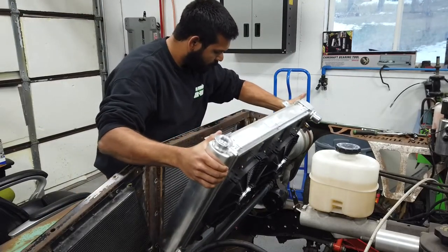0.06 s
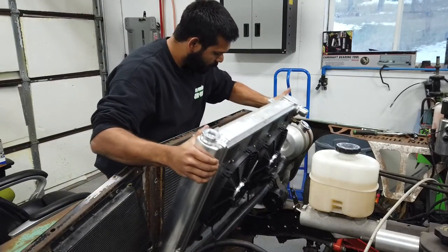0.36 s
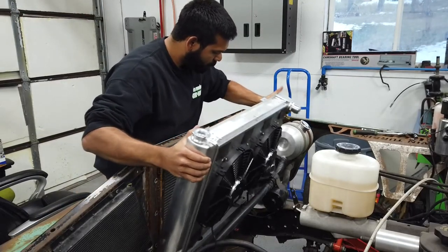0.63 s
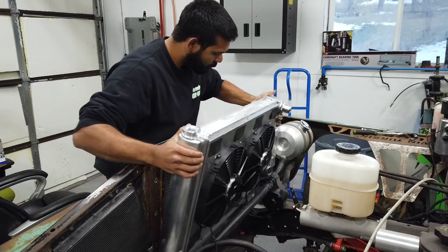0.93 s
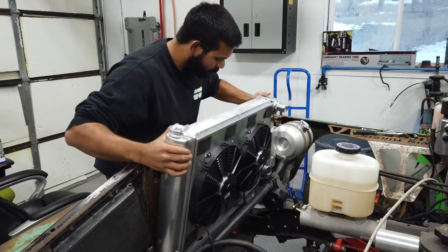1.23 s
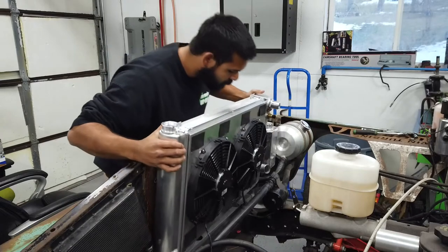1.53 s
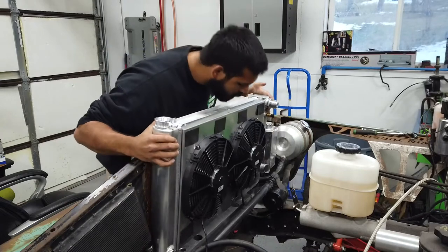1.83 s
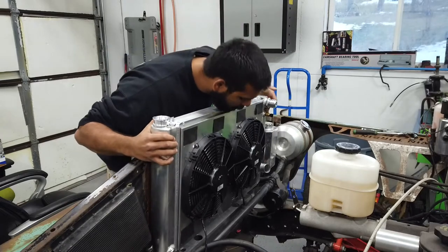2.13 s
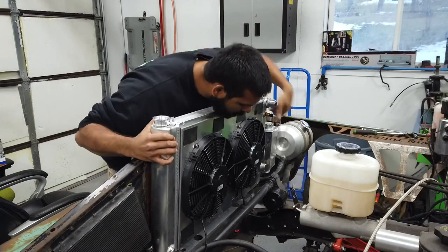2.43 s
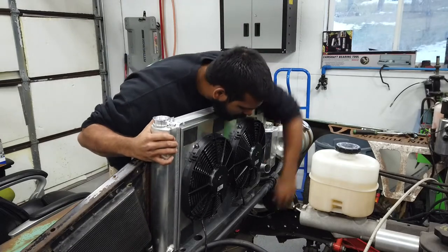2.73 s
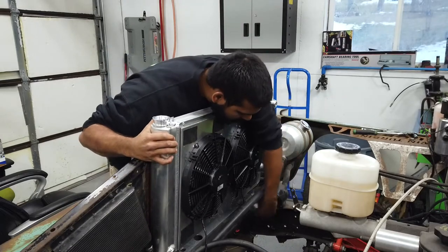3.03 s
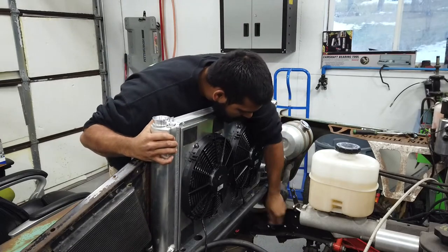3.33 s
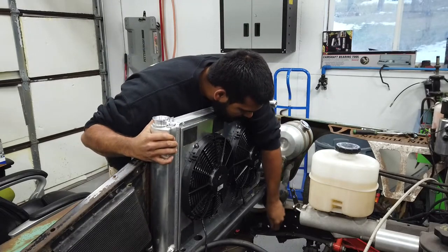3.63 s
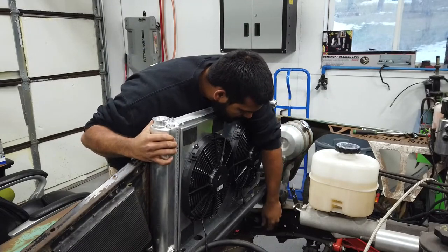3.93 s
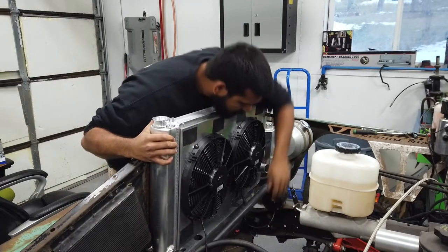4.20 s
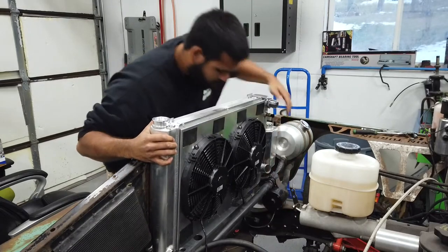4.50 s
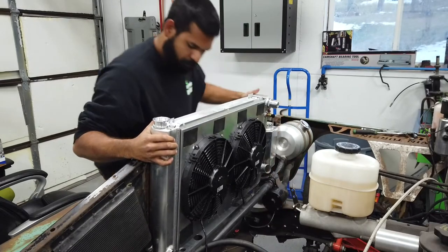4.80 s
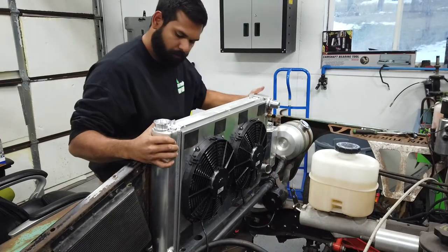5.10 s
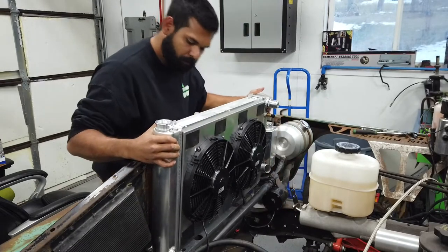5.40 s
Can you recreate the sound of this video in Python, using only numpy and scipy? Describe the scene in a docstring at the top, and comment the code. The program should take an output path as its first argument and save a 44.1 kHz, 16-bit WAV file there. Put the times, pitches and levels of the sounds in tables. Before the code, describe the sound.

A metal radiator is worked into a truck's front frame, heard from nearby in a garage with quiet room air and a faint electrical hum. It opens with a soft scrape and a brief metal groan, then light taps at about 0.5 seconds. From 1.1 to 3.2 seconds comes a run of irregular knocks, each a sharp snap with a short hollow ring. The strongest fall around 2 seconds and just after 3 seconds. Between them the metal scrapes and squeaks slightly, and a loose part clinks. After a lull of about a second, two more knocks with short groans come near 4.5 seconds. A last scrape and a small rattle follow at about 5.2 to 5.4 seconds. Throughout, the handling makes soft low bumps, and sleeves brush faintly against the metal.

```python
"""In a garage, over quiet room air and a mains hum, a metal radiator with its fans is lowered into a
truck's front frame. First come a scrape, a groan and light taps. From about 1 to 3 seconds it is rocked
into place: each knock snaps, the tanks, core and frame ring, and the room answers. In between, the metal
scrapes and a loose part clinks. Two more knocks come near 4.5 seconds, then a last scrape and rattle.
All along, the handling makes soft low bumps and sleeves brush the metal."""
import sys
import numpy as np
from scipy.fft import rfft, irfft, next_fast_len
from scipy.io import wavfile
from scipy.ndimage import map_coordinates

SR = 44100
rng = np.random.default_rng(int(sys.argv[2]) if len(sys.argv) > 2 else 0)


def put_to_file(sound):
    """Save the sound as 16-bit audio at rate SR, in the file named by the first command-line argument."""
    columns = np.atleast_2d(sound).T  # one column per channel
    safe = np.clip(columns, -1, 1)
    whole_steps = np.round(safe * 32767)
    wavfile.write(sys.argv[1], SR, whole_steps.astype(np.int16))


N = 244755

# The radiator hits the frame. Each row: start in seconds, strength in dB, then frame thud, tank boom
# and hardness in dB above that strength, and the struck spot's note in Hz.
KNOCK_EVENTS = [(0.508, -62.5, -5, -1, 24, 3670), (0.528, -61.5, -9, -13, 8, 900),
                (1.1276, -46, 12.5, 8.5, 11, 430), (1.289, -43.5, -7, -9.5, -6.5, 1833),
                (1.8655, -37, -15.5, 1, 10.5, 1980), (2.0511, -35.5, -1, -2, 3, 583),
                (2.128, -45.5, 4.5, -10, 1, 266), (2.295, -63, -4.5, -2.5, 17, 1147),
                (2.589, -61, -6, -13, -13, 1780), (2.918, -39.5, -16, 5.5, -1.5, 1503),
                (2.942, -44.5, -15, -2, -12, 556), (3.119, -36, 2, 1.5, 4, 1890),
                (3.137, -45.5, 2, 7.5, -5.5, 387), (3.211, -42, -10, -16.5, 13.5, 2010),
                (4.39, -43, -18, 1.5, -1, 576), (4.5764, -52.5, -14.5, 0, -8, 586)]
# The ringing has six bands: thud, boom, body, clank, edge, sizzle. Each entry: a band's centre in Hz.
BAND_CENTRES_HZ = [115, 275, 850, 2400, 4800, 9000]
# How a knock feeds the bands. Each row: offset in dB, then shares of thud, boom and hardness.
BAND_RECIPE = [(-2.5, 0.89, 0, 0), (0.5, 0.065, 0.84, 0.27), (-0.5, 0.02, 0.81, 0.34),
               (-1, 0.0064, 0, 0.011), (-20, 0.048, 0.018, 0.99), (-36.5, 0.2, 0.088, 0.86)]
# The tones in a crack. Each row: multiple of the crack's pitch, relative level in dB, life in seconds.
CRACK_TONES = [(1.15, 3.5, 0.00038), (.7, 2.5, 0.00028), (.31, -4.5, 0.00052)]
# The crack's echo off nearby surfaces, left then right. Each row: delay in seconds, gain in dB.
CRACK_ECHOES = [(.0034, -19.5), (.004, -11)]
# The tone colour of the ringing metal. Each row: frequency in Hz, relative level in dB.
RING_COLOUR = [(40, -13.5), (75, -3.5), (140, -2), (190, -5.5), (250, -0.5), (600, -4), (1200, -7),
               (2000, -12), (2950, -19), (3400, -28), (5100, -41), (6000, -51.5), (11300, -67),
               (16000, -79)]
# Its clearest tones. Each row: pitch in Hz, relative level in dB, seconds to fade by 60 dB.
CLEAR_TONES = [(154, -6.5, 0.57), (248, 5.5, 0.33), (356.4, 4.5, 0.25), (417, 1, 0.22), (466, -4.5, 0.37),
               (555.4, -4.5, 0.37), (595, 2.5, 0.16), (754, -1.5, 0.23), (912, -7, 0.38), (977, -6.5, 0.61),
               (1180, 3, 0.21), (1472, 0.5, 0.22), (1592, -4, 0.26), (1806, 2, 0.15), (1951, 3.5, 0.2),
               (2447, -1.5, 0.28), (2980, 4.5, 0.06)]
# How long metal and garage ring together. Each row: frequency in Hz, seconds to fade by 60 dB.
RING_FADE = [(80, 1), (250, 0.47), (700, 0.3), (2000, 0.44), (4500, 0.44), (11000, 0.27)]
# How slowly the ringing spreads. Each row: frequency in Hz, build-up time in seconds.
RING_BUILD = [(100, 0.0036), (260, 0.02), (600, 0.01), (1500, 0.003), (3500, 0.002), (8000, 0.027)]
# The struck spot flares before its energy spreads. Each row: frequency in Hz, dB above the ringing.
RING_FLARE = [(300, -17), (800, -7.5), (2000, -9), (4200, 2.5), (9000, -13)]
# How wide the metal sounds. Each row: frequency in Hz, left-right difference in dB against the middle.
METAL_WIDTH = [(30, -7), (60, -22), (110, -32), (300, -36), (600, -19.5), (1100, -16), (2200, -6.5),
               (4200, 1.5), (9000, 1)]
# A loose part clinks. Each row: start in seconds, strength in dB.
CLINK_EVENTS = [(1.381, -50), (1.455, -55), (2.093, -46.5), (3.137, -44.5), (5.315, -53), (5.324, -48),
                (5.36, -55.5), (5.394, -57.5)]
# A clink's ringing. Each entry: one band's relative level in dB, from thud to sizzle.
CLINK_BANDS_DB = [-2, -7.5, .5, -2.5, -23, -37.5]
# The radiator slides on the frame. Each row: peak time in seconds, rise time in seconds,
# grit level in dB, singing in dB above the grit.
SCRAPE_EVENTS = [(0.068, 0.083, -64.5, -14.5), (0.465, 0.064, -63, 0), (0.688, 0.13, -66, -4.5),
                 (1.037, 0.049, -68, -0.5), (1.697, 0.66, -61.5, -35), (2.17, 0.072, -45.5, -8.5),
                 (2.59, 0.051, -67, -12), (2.87, 0.086, -65.5, -11), (3.209, 0.048, -55, 6.5),
                 (5.226, 0.058, -55, -22), (5.392, 0.046, -62.5, -1.5)]
# The tone colour of the grit. Each row: frequency in Hz, relative level in dB.
GRIT_COLOUR = [(200, 19), (500, 10.5), (1300, 7.5), (2500, 0), (3800, -34), (5500, -17), (9000, -68)]
# Thin edges sing when rubbed. Each row: pitch in Hz, width in Hz, relative level in dB.
SINGING_EDGES = [(2156, 40, 7), (2665, 76, 0), (2865, 47, 4), (3280, 57, 3), (3680, 73, -3), (3950, 28, 1),
                 (4620, 250, -13.5), (7160, 120, -28), (7900, 270, -39)]
# Sleeves and hands brush the metal. Each row: peak time in seconds, rise time in seconds, level in dB.
SLEEVE_EVENTS = [(0.48, 0.063, -72), (.69, 0.14, -76), (1.187, 0.038, -62.5), (1.706, 0.57, -83.5),
                 (2.14, 0.25, -76), (2.613, 0.029, -74.5), (2.87, 0.17, -78), (3.2, 0.072, -73),
                 (4.264, 0.04, -73.5), (4.925, 0.52, -78)]
# The tone colour of the brushing. Each row: frequency in Hz, relative level in dB.
SLEEVE_COLOUR = [(2000, -7), (4000, -1), (6000, -12), (7700, -3), (9500, -9), (11500, 3.5), (13500, -16),
                 (16000, 0)]
# Dragged metal groans. Each row: peak time in seconds, rise time in seconds, level in dB, pitch in Hz.
GROAN_EVENTS = [(0.092, 0.057, -56.5, 211), (1.004, 0.033, -75, 3930), (1.658, 0.069, -54, 230),
                (2.234, 0.021, -43.5, 358), (2.248, 0.016, -43.5, 250), (4.471, 0.012, -42, 200),
                (4.633, 0.05, -50, 250), (5.245, 0.033, -45, 250)]
# Soft handling bumps. Each row: middle time in seconds, pitch in Hz, level in dB.
BUMP_EVENTS = [(0.101, 29.5, -34), (.473, 61, -38.5), (1.414, 48.3, -33), (3.104, 42.6, -32),
               (3.42, 48, -45.5), (3.757, 73, -34.5), (3.799, 30.6, -36), (4.538, 81.5, -44),
               (5.326, 55, -35.5), (5.488, 48.3, -39.5)]
# The tone colour of the room air. Each row: frequency in Hz, relative level in dB.
AIR_COLOUR = [(12, -36), (20, -3.5), (70, -4), (90, -23.5), (112, -5), (144, -11), (232, -15.5), (274, -22),
              (382, -20.5), (465, -23.5), (519, -20), (958, -23), (1070, -22), (5090, -52), (15500, -58)]
# How wide the air sounds. Each row: frequency in Hz, left-right difference in dB against the middle.
ROOM_WIDTH = [(30, 0), (60, -7.5), (120, -23), (300, -16.5), (600, -13.5), (1100, -9), (2200, 1),
              (4200, -6.5)]
# The tone colour of a thin steady hiss. Each row: frequency in Hz, relative level in dB.
HISS_COLOUR = [(8000, -51), (10300, -4), (11300, 8), (12500, -9), (13500, -57)]
# The tones of the mains hum. Each row: pitch in Hz, average level in dB.
HUM_TONES = [(119.5, -70), (474, -75), (565, -94), (915, -79)]


def knocks():
    """Weight behind a blow wakes the frame and tanks and softens the crack; a hard spot adds treble."""
    out = np.zeros((2, N))
    for start, db, thud_db, boom_db, hard_db, note_hz in KNOCK_EVENTS:
        bands_db = db + np.array(BAND_RECIPE) @ [1, thud_db, boom_db, hard_db]
        crack_db = db + 14.5 - 0.31 * thud_db  # a well-seated blow is cushioned
        add(out, start, contact(bands_db, crack_db, crack_hz=1943, note_db=db - 0.5, note_hz=note_hz))
    return out


def contact(bands_db, crack_db, crack_hz, note_db, note_hz):
    """Metal meets metal: a crack, its echo, the struck spot's note and the ringing."""
    t = np.arange(SR // 2) / SR
    snap = amp(crack_db) * crack(t, crack_hz)
    echo = np.array([amp(db) * np.interp(t - delay, t, snap, left=0) for delay, db in CRACK_ECHOES])
    return snap + echo + amp(note_db) * spot_note(t, note_hz) + amp(-1.81) * ringing(t, bands_db)


def crack(t, pitch_hz):
    """In the first instant, stiff metal shakes for just a few cycles. The peak is scaled to 1."""
    pitch = pitch_hz * np.exp(.03 * rng.standard_normal())
    out = 0
    for ratio, db, life in CRACK_TONES:
        envelope = (t / life) ** 2 * np.exp(-t / life)
        out += amp(db) * envelope * np.sin(2 * np.pi * ratio * pitch * (t - 2 * life))
    return out / np.abs(out).max()


def spot_note(t, hz, rise_s=.005, fade_s=.25):
    """The struck spot's own note: a few close tones that beat against each other as they die."""
    detune = .012 * rng.standard_normal((4, 1))
    cluster = np.sin(2 * np.pi * (hz * (1 + detune) * t + rng.random((4, 1)))).sum(0)
    note = unit(np.sin(2 * np.pi * hz * t) + .5 * cluster)
    return note * (1 - np.exp(-t / rise_s)) * amp(-60 * t / fade_s)


def ringing(t, bands_db, clear_db=-7.5, flare_s=.002):
    """Radiator and frame ring with countless close tones, made here from noise, and a few clear ones."""
    dense = noise(RING_COLOUR, METAL_WIDTH, size=len(t))
    hz, db, fade_s = np.transpose(CLEAR_TONES)[:, :, None]
    strength = amp(db + clear_db + look_up(RING_COLOUR, hz) / 2 + 2.8 * rng.standard_normal(hz.shape))
    phase = 2 * np.pi * rng.random(hz.shape)
    # offset the band's fade below, so each clear tone dies at its own speed
    own_fade = amp(t * (60 / look_up(RING_FADE, hz) - 60 / fade_s))
    clear = np.sum(strength * own_fade * np.sin(2 * np.pi * hz * t + phase), 0)
    bands = filtered(dense + clear, band_split)
    out = 0
    for band, centre, level_db in zip(bands, BAND_CENTRES_HZ, bands_db):
        # low bending waves spread slowly through the frame, so the boom arrives after the clank
        build = 1 - np.exp(-t / look_up(RING_BUILD, centre))
        flare = amp(look_up(RING_FLARE, centre)) * (t / flare_s) * np.exp(1 - t / flare_s)
        band = band * (build + flare) * amp(-60 * t / look_up(RING_FADE, centre))
        opening_level = np.std(band.mean(0)[t < .04])
        out += amp(level_db) * band / opening_level
    return out


def clinks():
    """A loose part rattles after a blow or a shove, always on the same note."""
    out = np.zeros((2, N))
    for start, db in CLINK_EVENTS:
        bands_db = db + np.array(CLINK_BANDS_DB)
        clink = contact(bands_db, crack_db=db + 14.5, crack_hz=1410, note_db=db + 1, note_hz=1212.5)
        add(out, start, clink)
    return out


def scrapes():
    """Sliding metal catches and slips, making grit and singing edges; sleeves add a fine hiss."""
    grit_level = sum(amp(db) * stroke(peak, rise) for peak, rise, db, _ in SCRAPE_EVENTS)
    sing_level = sum(amp(db + sing_db) * stroke(peak, rise) for peak, rise, db, sing_db in SCRAPE_EVENTS)
    sleeve_level = sum(amp(db) * stroke(peak, rise) for peak, rise, db in SLEEVE_EVENTS)
    catch_and_slip = unit(amp(1.3 * wobble(45) + 1.5 * wobble(300)))
    rubbing = noise([(1200, -23), (2200, 11)], METAL_WIDTH)
    singing = sing_level * unit(filtered(rubbing, edge_response))
    grit = grit_level * noise(GRIT_COLOUR, METAL_WIDTH)
    sleeves = sleeve_level * noise(SLEEVE_COLOUR, METAL_WIDTH)
    return catch_and_slip * (grit + singing + sleeves)


def edge_response(hz):
    """Each thin edge picks out the part of the rubbing that lies near its own pitch."""
    return sum((-1) ** k * amp(db) * 1j * hz * width / (pitch ** 2 - hz ** 2 + 1j * hz * width)
               for k, (pitch, width, db) in enumerate(SINGING_EDGES))


def groans(waver_hz=20.66):
    """Uneven slips drive one tone at a time: a panel groans, a thin edge squeaks."""
    t = np.arange(N) / SR
    drift = waver_hz * np.cumsum(wobble(130)) / SR
    out = 0
    for peak, rise, db, hz in GROAN_EVENTS:
        cycles = hz * t + np.sqrt(hz / 250) * drift  # wavers by waver_hz at 250 Hz, more higher up
        out += amp(db) * stroke(peak, rise) * np.sin(2 * np.pi * cycles)
    return out * unit(amp(2.3 * wobble(90)))


def bumps(wide_below_hz=40.4):
    """Soft pushes, each a cycle or two of deep bass; the deepest differ most between left and right."""
    t = np.arange(N) / SR
    out = 0
    for middle, hz, db in BUMP_EVENTS:
        rise = 0.45 / hz  # just under half a cycle
        side_phase = np.array([[1], [-1]]) / (1 + (hz / wide_below_hz) ** 4)
        out += amp(db) * swell(middle, rise, rise) * np.sin(2 * np.pi * hz * (middle - t) + side_phase)
    return out


def garage():
    """The background: a slightly unsteady mains hum, room air, a deep rumble and a thin hiss."""
    t = np.arange(N) / SR
    hum = sum(amp(db) * unit(np.sin(2 * np.pi * hz * t + 0.48 * wobble(3.075))) for hz, db in HUM_TONES)
    air = amp(-56.5 + 0.47 * wobble(3.908)) * noise(AIR_COLOUR, ROOM_WIDTH)
    rumble = unit(filtered(rng.standard_normal((2, N)), lambda hz: 1 / (1 + (hz / 40) ** 5)))
    hiss = noise(HISS_COLOUR, ROOM_WIDTH)
    return air + hum + amp(-60.5) * rumble + amp(-88) * hiss


def stroke(peak, rise):
    """One push of the hands: it builds to its peak, then eases off a little more slowly."""
    return swell(peak, rise, fall=1.1 * rise)


def swell(peak, rise, fall):
    """A bell-shaped rise and fall; all three times are in seconds."""
    t = np.arange(N) / SR - peak
    return np.exp(-.5 * (t / np.where(t < 0, rise, fall)) ** 2)


def wobble(rate):
    """A smooth curve through random values, rate of them a second."""
    return map_coordinates(rng.standard_normal(int(N * rate / SR) + 4), [np.arange(N) * rate / SR])


def noise(colour, width, size=N):
    """Stereo noise with the given tone colour and width, at an average level of 1."""
    def response(hz):
        return amp(look_up(colour, hz)) * np.array([np.ones_like(hz), amp(look_up(width, hz))])
    middle, side = filtered(rng.standard_normal((2, size)), response)
    return unit(np.array([middle + side, middle - side]))


def band_split(hz):
    """Share each frequency between the nearest bands of the ringing."""
    one_per_band = np.eye(len(BAND_CENTRES_HZ))
    shares = [np.interp(np.log(hz + 1), np.log(BAND_CENTRES_HZ), row) for row in one_per_band]
    return np.array(shares)[:, None]


def filtered(x, response):
    """Multiply each frequency in x by response(hz)."""
    size = x.shape[-1]
    padded = next_fast_len(size + 4096)
    hz = np.fft.rfftfreq(padded, 1 / SR)
    return irfft(rfft(x, padded) * response(hz), padded)[..., :size]


def look_up(table, hz):
    """Read between the rows of a frequency table, on a pitch-like (log) scale."""
    frequencies, values = np.transpose(table)
    return np.interp(np.log(hz + 1), np.log(frequencies + 1), values)


def amp(db):
    """Turn decibels into a gain."""
    return np.exp(np.asarray(db) * np.log(10) / 20)


def unit(x):
    """Scale x to an average (rms) level of 1."""
    return x / np.sqrt(np.mean(x ** 2) + 1e-30)


def add(track, start_s, sound):
    """Mix a sound into the track at the given time."""
    start = max(round(start_s * SR), 0)
    part = sound[..., :max(N - start, 0)]
    track[..., start:start + part.shape[-1]] += part


def placed(x, lag_s):
    """Let x reach the left ear lag_s seconds after the right."""
    return filtered(x, lambda hz: np.exp(1j * np.pi * hz * lag_s * np.array([[-1], [1]])))


def scene():
    """Mix the radiator, a little to the right, with the garage and the handling bumps."""
    metal = knocks() + clinks() + scrapes() + groans()
    return placed(metal, lag_s=2.9e-5) + placed(garage(), lag_s=1.6e-5) + bumps()


def record(dry, top_hz=15700):
    """Cut off the very highest treble."""
    return filtered(dry, lambda hz: hz < top_hz)


dry = scene()
out = record(dry)
put_to_file(out)
```